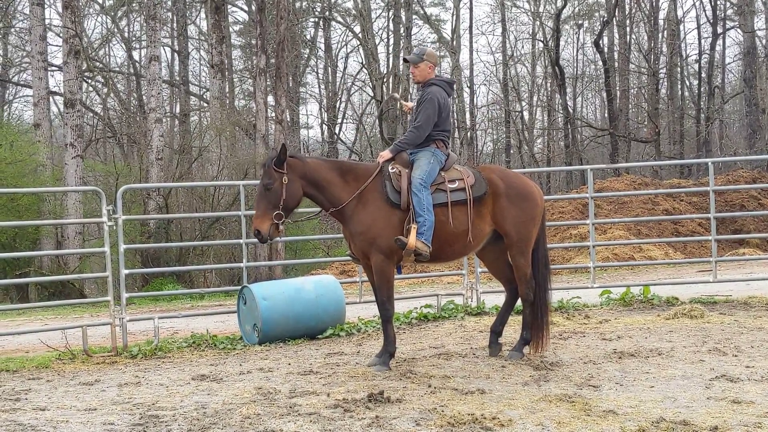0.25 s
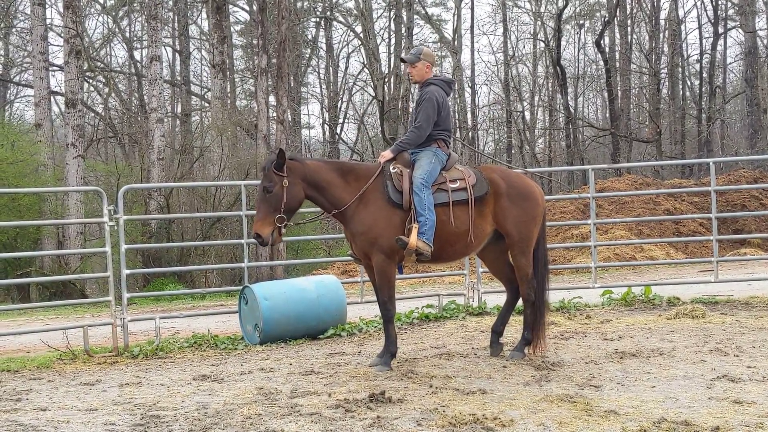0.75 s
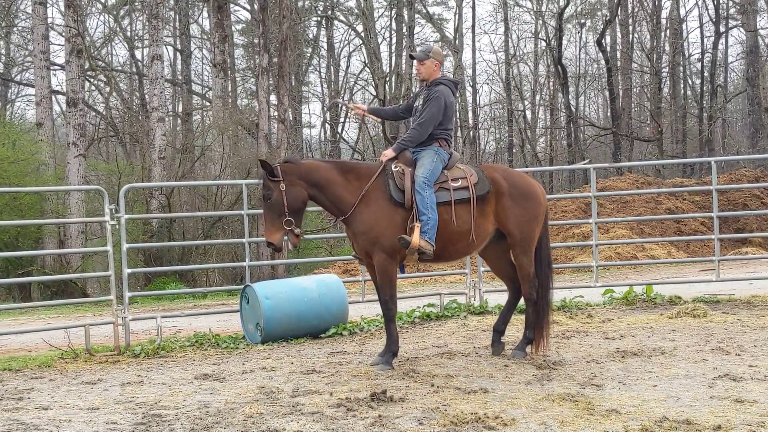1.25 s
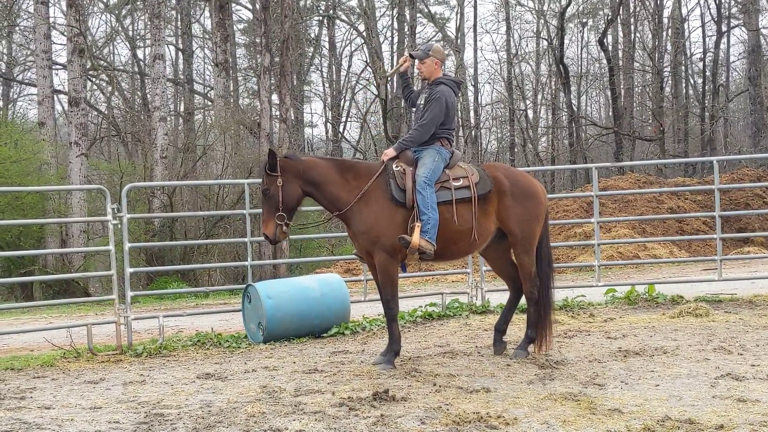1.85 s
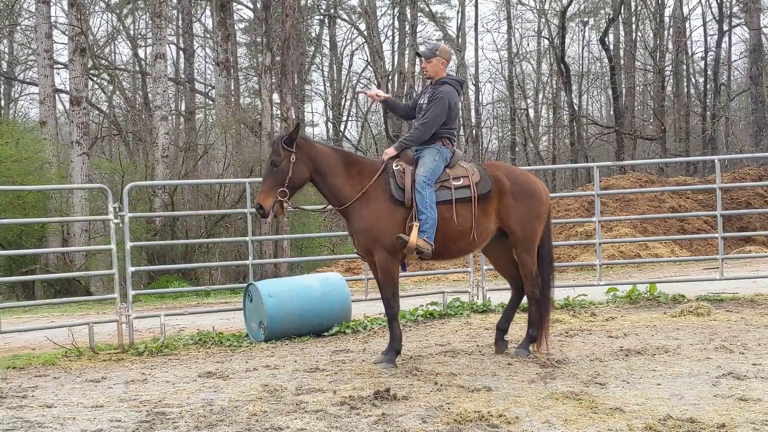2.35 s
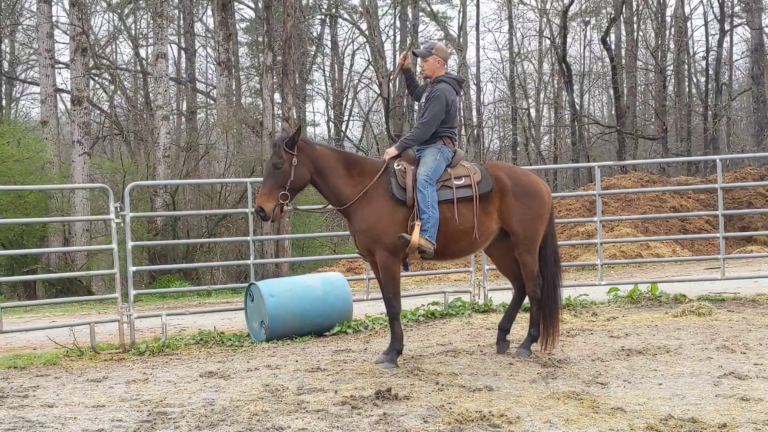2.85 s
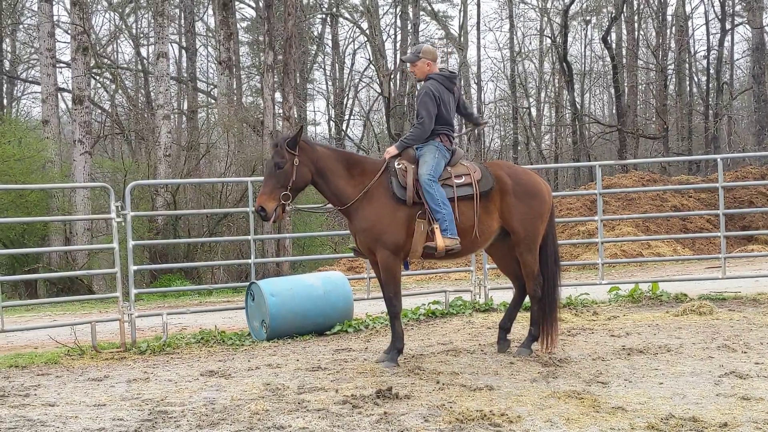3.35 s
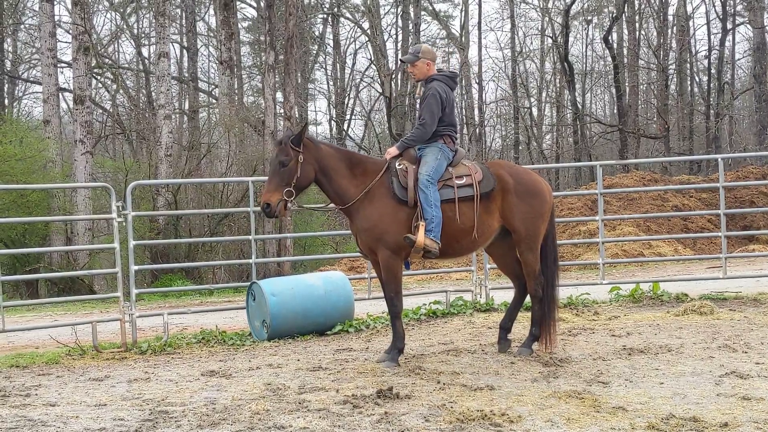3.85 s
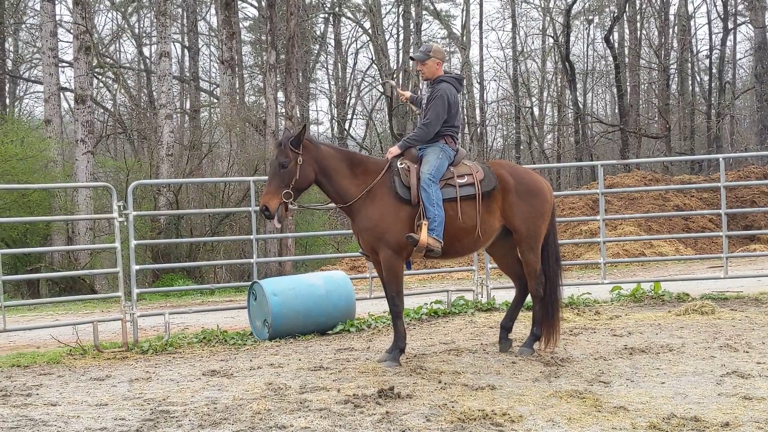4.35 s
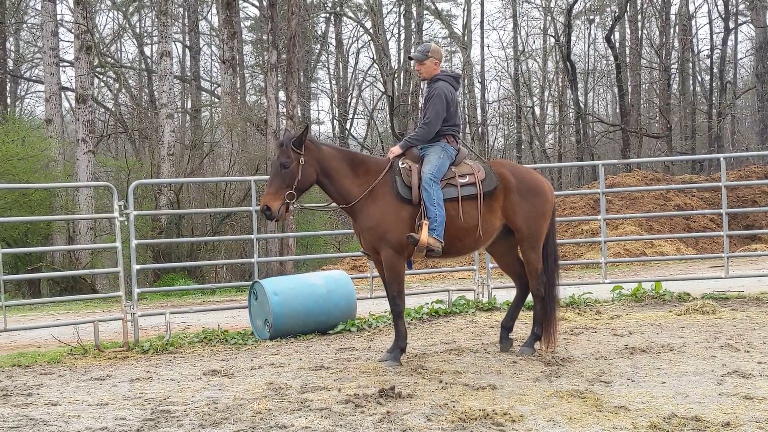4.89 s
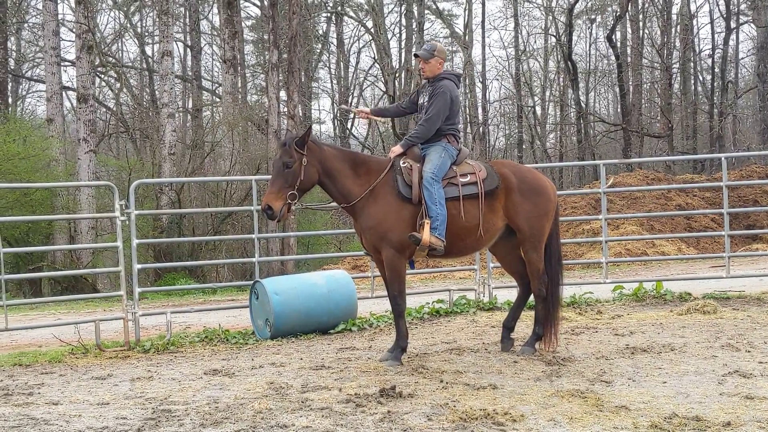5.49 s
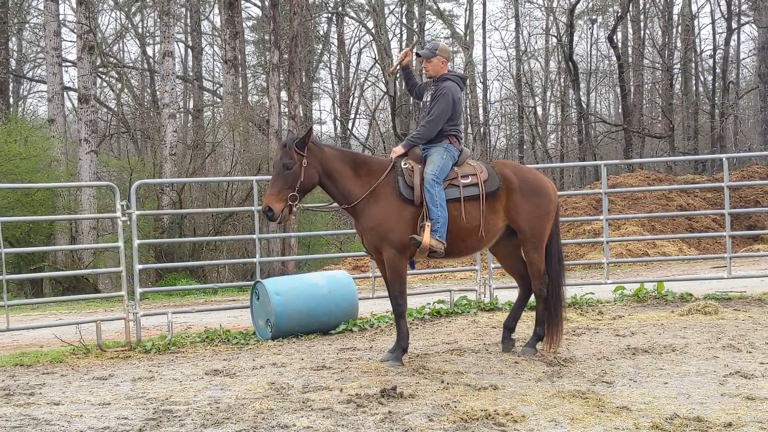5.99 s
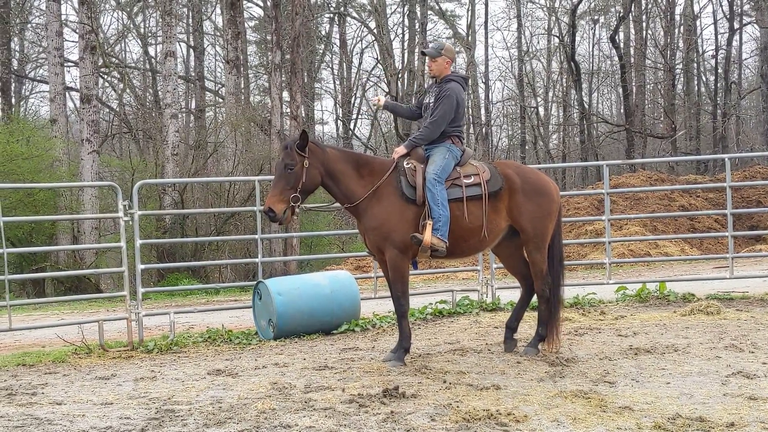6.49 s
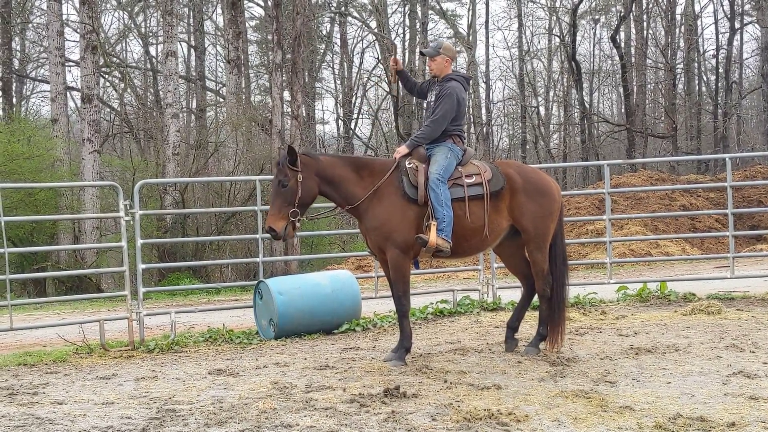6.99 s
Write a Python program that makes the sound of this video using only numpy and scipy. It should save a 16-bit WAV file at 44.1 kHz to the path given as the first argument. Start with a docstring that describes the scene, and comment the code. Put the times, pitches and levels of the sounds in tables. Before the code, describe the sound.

A rope whistles through the air and cracks once very loudly nearby, echoing off fence and woods while birds sing outdoors.

```python
"""A rope whip is swung overhead in a sand arena at the edge of a wood: it whistles past and cracks once, close by.
Sweeps are bands of noise with gliding pitch; the crack is a short shock that overloads the microphone.
Fence and trees answer it with shaped noise, and the rope's end pats the sand.
Echoes of an earlier crack are still dying away at the start.
Birds sing gliding notes among the trees, over a low distant rumble and faint hiss."""
import sys
import numpy as np
from scipy import signal
from scipy.fft import rfft, irfft
from scipy.io import wavfile
from scipy.ndimage import uniform_filter1d

SR = 44100
rng = np.random.default_rng(int(sys.argv[2]) if len(sys.argv) > 2 else 0)


def waveform_to_disk(signal):
    """Save audio, clipped to [-1, 1], as 16-bit WAV at the path in sys.argv[1]."""
    frames = np.transpose(np.atleast_2d(signal))
    scaled = np.clip(frames, -1, 1) * 32767
    samples = np.round(scaled).astype(np.int16)
    wavfile.write(sys.argv[1], SR, samples)


N = 318843

# when the cracks fall, in seconds; the earlier one lies before the start
CRACK_S, EARLIER_CRACK_S = 3.5578, -.6
# upper limit of the band, in Hz
EDGE_HZ = 15900
# every sweep: share of its length spent speeding up, spread of the whistle as a share of its pitch
SPEED_UP, WHISTLE_SPREAD = .4, .17

# Background spectrum. Each row: frequency in Hz, relative level in dB per Hz.
AIR_SPECTRUM = [(10, -9), (25, 1), (60, -6), (140, -9), (230, -12), (400, -24), (750, -28), (1100, -33),
                (1900, -35), (2700, -30), (3700, -33), (5400, -32), (6600, -36), (14500, -42)]
# Course of the distant rumble. Each row: time in seconds, relative level in dB.
RUMBLE_LEVEL = [(0, 2), (1.6, 0), (3, .5), (4.3, .5), (5.2, -2), (5.7, 0.5), (6.7, .5), (7.2, -1)]
# Ring of the wood. Each row: frequency in Hz, time to fall by 60 dB in seconds.
WOOD_DECAY = [(150, 2.4), (1000, 2.8), (3000, 3.25), (5500, 2.7), (8000, 3.2), (10000, .9), (15000, 0.23)]
# Distinct fronts: echoes, and slaps of the rope's end on the sand. Each row: seconds after the crack, relative
# peak level in dB, time to the peak in seconds, frequency in Hz that the front favours.
ECHO_FRONTS = [(.015, -23, .0006, 2698), (.053, -28, .005, 2400), (.066, -26.5, 0.0057, 4640),
               (0.0673, -27, 0.00043, 13500), (.172, -32, 0.0032, 3400), (.184, -31.5, 0.0088, 4600),
               (.211, -30, 0.0017, 9900), (.2194, -24.5, 0.00069, 4760), (.249, -32, .013, 2300),
               (.261, -32.5, 0.0024, 1800), (.312, -41, 0.008, 5000), (.399, -36.5, 0.0029, 4400)]
# Thrown back by ground, rails and trees. Each row: frequency in Hz, relative level in dB per Hz.
SCATTER_SPECTRUM = [(80, -9), (350, -15), (620, -12), (850, -4.5), (1100, -7), (2700, -1.5), (4800, -3.5),
                    (5800, -2), (6700, -11), (8200, -6), (12000, -8.5), (16000, -10)]
# Coming back from deep in the wood. Each row: frequency in Hz, relative level in dB per Hz.
FAR_SCATTER_SPECTRUM = [(100, -11), (500, -7), (900, 0), (1900, 0), (2750, 3), (3600, -3), (4600, -1.5),
                        (5700, -4), (6700, -12), (9600, -12), (15000, -19)]
# Treble peaks and dips of the microphone's ports. Each row: frequency in Hz, gain in dB.
PORT_RESPONSE = [(5000, -0.5), (5850, 1), (6400, -3), (7600, 2.5), (8500, -3), (9500, 4), (10400, -4),
                 (11800, 3), (12700, -4), (13800, 0), (16000, -2)]
# Bird motifs. Each row is a note: seconds into the motif, length in seconds,
# start, middle and end pitch in Hz, relative level in dB.
TRILL_NOTES = [(0, .019, 4600, 5450, 5650, -1.5), (.012, .022, 5700, 5150, 4200, -4),
               (.042, .016, 6600, 7700, 8250, -1), (.056, .016, 8150, 7900, 6900, -7)]
ROLL_NOTES = [(0, .045, 2170, 2240, 2400, -3), (.035, .035, 2520, 2640, 2560, -3),
              (.055, .035, 2550, 2300, 1900, -4), (.128, .02, 3800, 3450, 2950, -6),
              (.16, .04, 2100, 2230, 2330, -6), (.195, .045, 2950, 3070, 2950, 1),
              (.228, .06, 2950, 2650, 2600, -1)]
SLUR_NOTES = [(0, .042, 5000, 4350, 3150, 0)]
WHISTLE_NOTES = [(0, .045, 2170, 2230, 2300, -4), (.052, .066, 2330, 2790, 2960, 2),
                 (.14, .03, 4000, 4350, 3300, -5), (.17, .036, 2700, 3220, 3380, 0),
                 (.216, .06, 2650, 2200, 1870, -7.5)]
# The rope's end touches the sand. Each row: start in seconds, thud level in dB, thud pitch in Hz,
# level of the spray of grit in dB.
SAND_TOUCHES = [(.126, -47, 880, -71), (.279, -56, 860, -70), (.391, -52, 740, -58), (.404, -56, 900, -56),
                (.443, -59, 800, -64), (1.985, -64, 950, -88), (2.222, -62, 940, -88),
                (4.236, -47.5, 1600, -72), (4.247, -51, 1600, -73), (4.284, -49, 1340, -75),
                (4.294, -54, 1400, -77), (4.57, -53.5, 497, -72), (4.6403, -45, 830, -59),
                (4.648, -63, 1480, -55.5), (4.659, -56, 850, -66), (4.687, -55, 850, -70)]
# Small clicks of the tack. Each row: start in seconds, level in dB, pitch in Hz.
TACK_CLICKS = [(1.264, -69, 13000), (1.296, -54, 9200), (5.28, -67.5, 9550), (5.485, -65.5, 9400)]
# Soft bumps on the microphone. Each row: start in seconds, level in dB.
HANDLING_BUMPS = [(.28, -42.5), (4.575, -40)]
# The rope sweeps past. Each row: loudest moment in seconds, length in seconds, pitch in Hz,
# glide in octaves per second, level in dB, rush of the tip in dB against the whistle,
# tip speed over mid-rope speed (a ratio).
ROPE_SWEEPS = [(.375, .09, 666, 2.5, -61, -17, 1.2), (1.628, .028, 1188, -3, -57, -5, 1.27),
               (1.66, 0.076, 833, -2.6, -53, -17, 1.75), (2.581, .17, 648, 0.5, -69, -7, 1.15),
               (2.8, .13, 660, -2.5, -61.5, -9, 1.06), (3.448, 0.15, 742, 3, -59, -10.5, 1.36),
               (3.531, 0.055, 960, 2, -53, -15, 1.7), (3.79, .03, 996, 0, -48, -16, 1.4),
               (3.864, 0.057, 1010, -2, -48, -8, 1.4), (4.62, 0.051, 605, 6.5, -63.5, -10, 1.38),
               (5.903, .036, 977.5, -0.5, -50, -17.5, 1.56), (5.947, .07, 803, -4.5, -54, -24, 1.4),
               (6.679, .16, 500, .5, -69.5, -2, 1.45), (6.796, 0.084, 690, -1.5, -61, -7.5, 1.13),
               (6.858, 0.076, 720, -2.5, -65, -6, 1.1), (7.019, .12, 601, -2, -63, -4, 1.22),
               (7.154, .1, 450, -3, -71.5, -14, 1.2)]
# The crack close by. Each row: frequency in Hz, relative level in dB per Hz.
CRACK_SPECTRUM = [(60, -17), (140, -2.5), (230, -4.5), (470, -12), (620, -4), (800, 4), (1030, -7),
                  (1250, 1), (1700, 1), (1980, -7), (2200, 0), (2450, -3), (2850, 3), (3200, -2), (3450, 0),
                  (3700, -9), (4800, -12), (5500, -8), (5900, -2), (6200, -11), (6800, -14), (9500, -10),
                  (11800, -6.5), (16000, -13)]
# The crack's treble leans to the right. Each row: frequency in Hz, left minus right in dB.
CRACK_BALANCE = [(60, 2.0), (150, 3.0), (380, 0.5), (950, 1.5), (2380, 0.0), (5980, -3.0), (15000, -3.0)]
# Scattered at once by the sand and nearest rails. Each row: frequency in Hz, relative level in dB per Hz.
NEAR_SPECTRUM = [(80, -10), (300, -11), (600, -14), (850, -7), (1150, -8), (1700, -1), (2700, 2),
                 (3600, -6), (4600, -7), (5800, -5), (6800, -9), (11800, -7), (16000, -13)]
# Narrow peaks of the fence rails' reflection. Each row: frequency in Hz, half width in Hz, relative level in dB.
RAIL_PEAKS = [(1251.5, 20, -2), (1650, 22, -4), (1783, 29, 1), (2228, 32, 0), (2595, 20, 1), (2712, 49, 2),
              (3000, 30, 0), (3900, 50, -8.5), (5330, 45, -5.5), (5900, 29, 1), (7767, 30, -11),
              (7950, 96, -9.5), (9400, 51, -6), (12100, 41, -9), (12000, 29, -8), (11300, 55, -8)]


def amp(db):
    """Decibels to gain."""
    return 10 ** (np.asarray(db) / 20)


def unit(x):
    """Scales to rms 1."""
    return x / np.sqrt(np.mean(x ** 2) + 1e-20)


def read(points, hz):
    """Reads a table of values on a log-frequency axis."""
    f, value = np.transpose(points)
    return np.interp(np.log(hz + 1), np.log(f + 1), value)


def add(mix, s, sound):
    """Adds a mono or stereo sound at time s, which may lie before the start."""
    at = round(s * SR)
    sound = sound[..., max(-at, 0):]
    part = mix[:, max(at, 0):][:, :sound.shape[-1]]
    part += sound[..., :part.shape[1]]


def pair(size, same_below_hz, most=.93):
    """White noise at two microphones: alike in the bass, unrelated in the treble."""
    left, other = rfft(rng.standard_normal((2, size)))
    same = most / (1 + (np.fft.rfftfreq(size, 1 / SR) / same_below_hz) ** 2)
    right = same * left + np.sqrt(1 - same ** 2) * other
    return irfft(np.array([left, right]), size)


def colour(x, points, size=4096):
    """Causal filter of unit energy with the given spectrum, heard through the microphone's ports."""
    hz = abs(np.fft.fftfreq(size, 1 / SR))
    log_gain = np.log(amp(read(points, hz) + read(PORT_RESPONSE, hz)))
    # minimum phase: the energy comes as early as the spectrum allows
    response = np.exp(np.conj(signal.hilbert(log_gain)))
    taps = np.fft.ifft(response).real[:size // 2]
    taps /= np.linalg.norm(taps)
    return signal.oaconvolve(x, taps[None], axes=1)[:, :x.shape[1]]


def resonate(x, hz, width):
    """A resonance of gain 1 that follows hz."""
    turn = np.exp(2j * np.pi * np.cumsum(hz * np.ones(x.shape[-1])) / SR)
    r = np.exp(-np.pi * width / SR)
    # shift the pitch down to zero, smooth, and shift back
    smooth = signal.lfilter([1 - r], [1, -r], x / turn)
    return 2 * (turn * smooth).real


def band(x, hz, width, order):
    """Several equal resonances in a row, for steep skirts, scaled to rms 1."""
    for _ in range(order):
        x = resonate(x, hz, width)
    return unit(x)


def swell(t, peak_s):
    """Rises to 1 at peak_s, then dies away."""
    u = np.maximum(t, 0) / peak_s
    return u * np.exp(1 - u)


def fade(x, db_of, size=256):
    """Applies a gain in dB that depends on frequency and time."""
    hz, t, z = signal.stft(x, SR, nperseg=size)
    faded = signal.istft(z * amp(db_of(hz[:, None], t)), SR, nperseg=size)[1]
    return faded[:, :x.shape[1]]


def background(level_db=-58, waver_db=1.56, hiss_db=-83):
    """Distant rumble whose bass wavers, and faint hiss with the microphone's own two treble peaks."""
    hz = np.fft.rfftfreq(N, 1 / SR)
    air = unit(irfft(rfft(pair(N, 1300)) * amp(read(AIR_SPECTRUM, hz)), N))
    # noise slower than 8 Hz makes the level waver
    drift = unit(irfft(rfft(rng.standard_normal(N)) * (hz < 8), N))
    low = signal.sosfilt(signal.butter(2, 400, fs=SR, output="sos"), air)
    course_db = np.interp(np.arange(N) / SR, *np.transpose(RUMBLE_LEVEL))
    rumble_gain = amp(waver_db * drift + course_db)
    self_noise = rng.standard_normal((2, N))
    upper_hiss = band(self_noise, 11900, 800, order=2)
    lower_hiss = band(self_noise, 9600, 1000, order=2)
    hiss = unit(upper_hiss + 1.1 * lower_hiss)
    return amp(level_db) * (air + low * (rumble_gain - 1)) + amp(hiss_db) * hiss


def wood():
    """Countless trunks scatter a sound into decaying noise; each frequency dies at its own rate."""
    return fade(pair(2 * SR, 1800), lambda hz, t: -60 * t / read(WOOD_DECAY, hz))


def echoes(wood_db=-42, absorb_db=26, grain_db=2.5, trail_db=-8.5, trail_s=.057,
           arena_db=-38, arena_s=.09, tint_db=-7, tint_width_hz=1500):
    """Fence, sheds and tree line answer, and the rope's end slaps the sand, each front with its tint; the later
    a front, the more treble the air takes."""
    t = np.arange(2 * SR) / SR
    # every front drags a trail of smaller reflections, over the even scatter from the arena
    fronts = sum((amp(db) * swell(t - s, peak_s)) ** 2 for s, db, peak_s, _ in ECHO_FRONTS)
    trails = signal.fftconvolve(fronts, np.exp(-t / trail_s) / (trail_s * SR))[:len(t)].clip(0)
    arena = amp(arena_db) * np.exp(-t / arena_s) * (1 - np.exp(-t / .012))
    # slow noise makes the level uneven
    unevenness = unit(uniform_filter1d(rng.standard_normal(len(t)), size=70))
    grain = unit(amp(grain_db * unevenness))
    distinct = pair(len(t), 1100) * np.sqrt(amp(trail_db) * trails + arena ** 2) * grain
    brief = t[:SR // 7]
    for s, db, peak_s, hz in ECHO_FRONTS:
        tint = amp(tint_db) * band(pair(len(brief), 1100), hz, tint_width_hz, order=2)
        front = pair(len(brief), 1100) + tint
        add(distinct, s, amp(db) * swell(brief, peak_s) * front)
    # absorb_db is the loss per second at 10 kHz
    distinct = fade(distinct, lambda hz, t: -absorb_db * t * (hz / 10000) ** 2)
    diffuse = amp(wood_db) * wood() * np.sqrt(grain) * (1 - np.exp(-t / .03))
    # both lean to the right
    near_part = colour(distinct, SCATTER_SPECTRUM) * amp([[-2.5], [2]])
    far_part = colour(diffuse, FAR_SCATTER_SPECTRUM) * amp([[-1.5], [1.5]])
    return near_part + far_part


def song(motif, start_s, period_s, levels_db, dry_db, waver, count, tail_s, slowing=0, skip=0):
    """A bird repeats a motif of gliding, wavering whistles, heard directly and through the trees.

    It sings count notes, entering after skip notes; levels_db holds start, middle and end of the song.
    """
    out = np.zeros((2, N))
    arch = np.interp(np.linspace(0, 2, count), [0, 1, 2], levels_db)
    for note, level_db in enumerate(arch, skip):
        k, place = divmod(note, len(motif))
        s, length, *glide_hz, db = motif[place]
        u = np.linspace(0, 1, round(length * SR))
        wobble = unit(uniform_filter1d(rng.standard_normal(len(u)), size=70))
        glide = np.polyval(np.polyfit([0, .5, 1], glide_hz, 2), u)
        hz = glide * (1 + waver * wobble)
        tone = np.sin(np.pi * u) * np.sin(2 * np.pi * np.cumsum(hz) / SR)
        # slowing spreads the notes of each later motif further apart
        at = start_s + k * period_s + s * (1 + slowing * k)
        # each note's level strays by about 1 dB
        add(out, at, amp(level_db + db + rng.standard_normal()) * tone)
    tail = wood() * np.exp(-np.arange(2 * SR) / SR / tail_s)
    wet = signal.fftconvolve(out, tail / np.linalg.norm(tail[0]), axes=1)[:, :N]
    return amp(dry_db) * out + wet


def birds():
    """Four birds at different distances; a lower direct level leaves more of the song to the trees."""
    trill = song(TRILL_NOTES, .017, .0938, levels_db=(-57, -58, -65.5), dry_db=-3.5,
                 waver=.02, count=46, tail_s=.06)
    rolls = song(ROLL_NOTES, 1.795, .402, levels_db=(-65, -63.5, -64.5), dry_db=-5,
                 waver=.03, count=28, tail_s=.15)
    rolls += song(ROLL_NOTES, 6.208, .405, levels_db=(-68, -62.5, -63.5), dry_db=-4,
                  waver=.03, count=15, tail_s=.15, skip=5)
    whistles = song(WHISTLE_NOTES, 4.047, .407, levels_db=(-58.5, -61.5, -60.5), dry_db=2,
                    waver=.015, count=15, tail_s=.18, slowing=.05)
    slurs = song(SLUR_NOTES, 4.519, .135, levels_db=(-69, -67, -74.5), dry_db=3,
                 waver=.02, count=10, tail_s=.17)
    return trill + rolls + whistles + slurs


def small_hits(thud_s=.0013, grit_s=.0049, click_s=.0018):
    """Brief noise swells: dull pats of rope on sand with a spray of grit, and thin ticks of buckles."""
    out, t = np.zeros((2, N)), np.arange(SR // 10) / SR
    for s, thud_db, hz, grit_db in SAND_TOUCHES:
        thud = band(pair(len(t), 1200), hz, 820, order=3) * swell(t, thud_s)
        grit = pair(len(t), 1200) * swell(t, grit_s)
        add(out, s, amp(thud_db) * thud + amp(grit_db) * grit)
    for s, db, hz in TACK_CLICKS:
        click = band(pair(len(t), 1500), hz, 2100, order=1) * swell(t, click_s)
        add(out, s, amp(db) * click)
    return out


def bumps(hz=35, width_hz=60, peak_s=.021, thump_db=-13, rebound=.76, lag_s=.048):
    """The hand-held microphone is jogged: a push and its rebound, with a dull thump in the deep bass."""
    out, t = np.zeros((2, N)), np.arange(SR // 2) / SR
    push = swell(t, peak_s) ** 2 - rebound * swell(t - lag_s, 2 * peak_s) ** 2
    for s, db in HANDLING_BUMPS:
        thump = band(pair(len(t), 900), hz, width_hz, order=3) * swell(t, 2 * peak_s)
        add(out, s, amp(db) * (push + amp(thump_db) * thump))
    return out


def whistle(peak_s, length_s, hz, glide, db, rush_db, tip_speed, rush_spread=.45):
    """Vortices peel off the rope: a steadily gliding whistle, and a wider, higher rush from the faster tip."""
    t = np.arange(-1.5 * length_s, 2 * length_s, 1 / SR)
    share = np.where(t < 0, SPEED_UP, 1 - SPEED_UP)
    level = 1 / np.cosh(2 * t / (length_s * share))
    pitch = hz * 2 ** (glide * t)
    air = pair(len(t), 2000)
    rope = band(air, pitch, WHISTLE_SPREAD * hz, order=3)
    tip = band(air, tip_speed * pitch, rush_spread * hz, order=4)
    return peak_s + t[0], amp(db) * level * (rope + amp(rush_db) * tip)


def swings():
    """Every sweep of the rope past the microphone: long ones hum, short ones whistle."""
    out = np.zeros((2, N))
    for row in ROPE_SWEEPS:
        add(out, *whistle(*row))
    return out


def lash(level_db=-44, rise_s=.008, hz=1050):
    """The last rush of the tip: a band of noise that grows up to the crack."""
    t = np.arange(-SR // 10, 0) / SR
    rush = band(pair(len(t), 2000), hz, 700, order=3)
    return CRACK_S + t[0], amp(level_db) * np.exp(t / rise_s) * rush


def crack(blast_db=-6.5, near_db=-15, near_s=.026, rails_db=-21, rails_s=.026):
    """The tip's shock and its ground bounces, then the scatter from sand and rails."""
    t = np.arange(SR // 3) / SR
    rise_s, hold_s, fall_s = .0006, .0038, .0026
    shape = (1 - np.exp(-t / rise_s)) * np.exp(-np.maximum(t - hold_s, 0) / fall_s)
    # a shock holds all frequencies evenly; only the fine ripple of its bounces stays
    shocks = rfft(pair(len(t), 2600) * shape)
    shocks /= np.sqrt(uniform_filter1d(abs(shocks) ** 2, size=80, axis=1) + 1e-9)
    blast = colour(irfft(shocks, len(t)) * (t < t[-1] / 2), CRACK_SPECTRUM)
    blast *= np.linalg.norm(shape) / np.linalg.norm(blast, axis=1, keepdims=True)
    sides = np.array([.5, -.5])[:, None, None]
    blast = fade(blast, lambda hz, t: read(CRACK_BALANCE, hz) * sides)
    near_shape = (1 - np.exp(-t / .0041)) * np.exp(-t / near_s)
    near = colour(pair(len(t), 1000) * near_shape, NEAR_SPECTRUM)
    drive = pair(len(t), 1100) * np.exp(-t / .004)
    rails = sum(amp(db) * unit(resonate(drive, hz, 2 * width)) for hz, width, db in RAIL_PEAKS)
    # rails_s sets the energy of the ringing, not its decay
    rails = unit(rails) * np.sqrt(rails_s / t[-1])
    # the scatter leans to the right
    scatter = (amp(near_db) * near + amp(rails_db) * rails) * amp([[-2.5], [2]])
    return amp(blast_db) * blast + scatter


def overload(push_db=-12.6, push_s=.018, rebound_db=-18, rebound_s=.068, lag_s=.02,
             settle_db=-44, settle_s=.36):
    """The shock pushes the microphone off its rest point; it swings back, overshoots and settles slowly."""
    t = np.arange(2 * SR) / SR
    push = amp(push_db) * swell(t, push_s) ** 2
    rebound = amp(rebound_db) * swell(t - lag_s, rebound_s) ** 2
    settle = amp(settle_db) * swell(t, settle_s) ** 2
    # a little louder on the left, a little softer on the right (1 dB)
    return (rebound - push - settle) * amp([[1], [-1]])


def scene():
    """Everything in the arena."""
    out = background() + birds() + small_hits() + bumps() + swings()
    add(out, EARLIER_CRACK_S, amp(-1) * echoes())
    add(out, *lash())
    for part in (crack(), echoes(), overload()):
        add(out, CRACK_S, part)
    return out


def record(dry, ceiling=.76):
    """Peaks are squashed towards the ceiling; then the band limit."""
    squashed = ceiling * np.tanh(dry / ceiling)
    low_pass = signal.firwin(511, EDGE_HZ, window=("kaiser", 9), fs=SR)
    return signal.oaconvolve(squashed, low_pass[None], "same")


dry = scene()
out = record(dry)
waveform_to_disk(out)
```